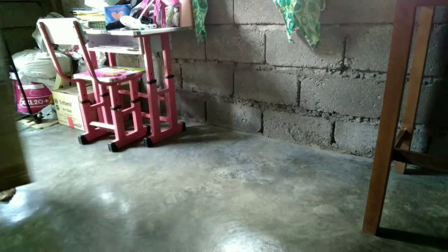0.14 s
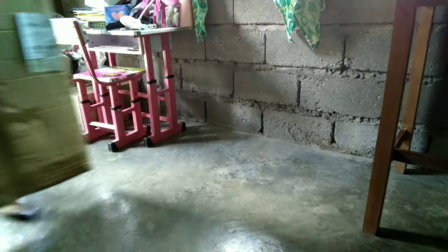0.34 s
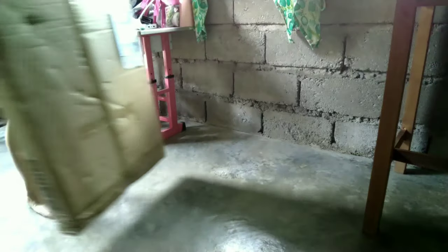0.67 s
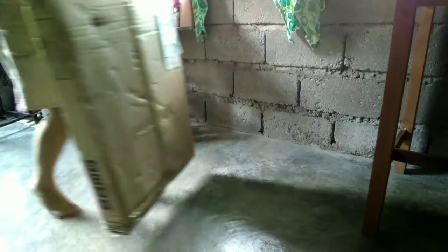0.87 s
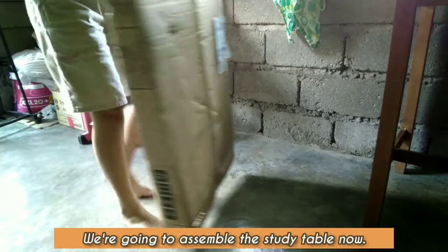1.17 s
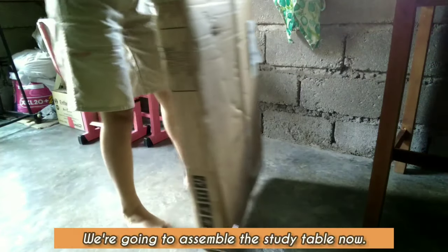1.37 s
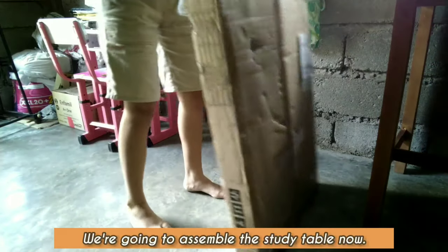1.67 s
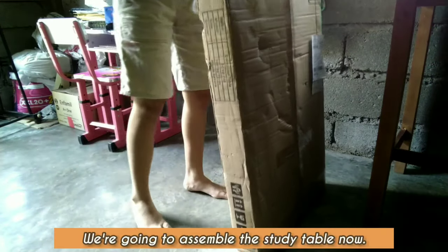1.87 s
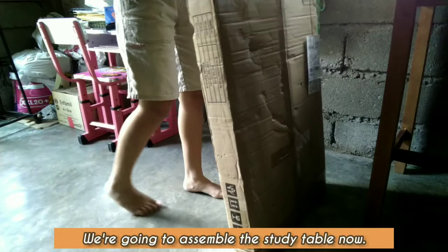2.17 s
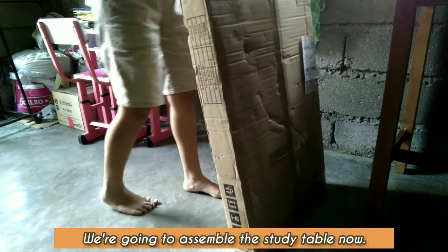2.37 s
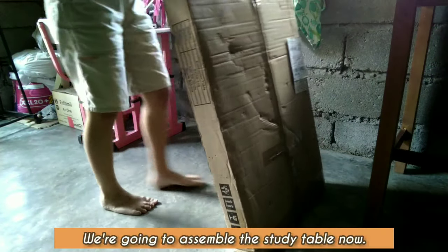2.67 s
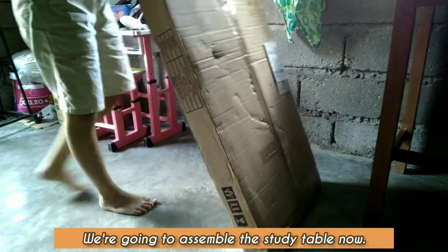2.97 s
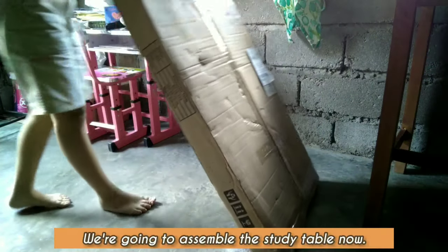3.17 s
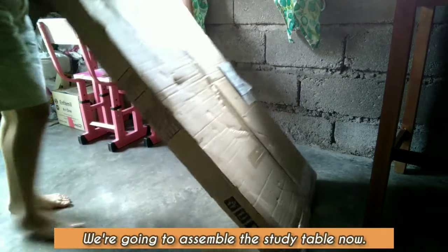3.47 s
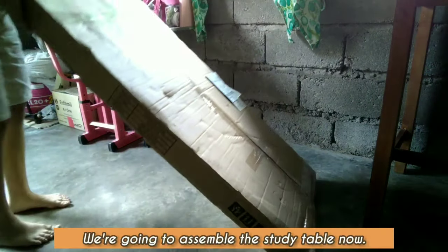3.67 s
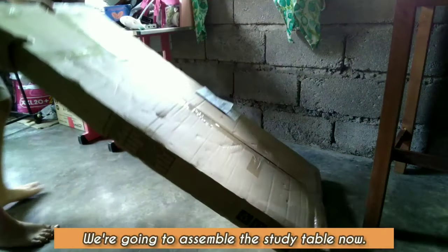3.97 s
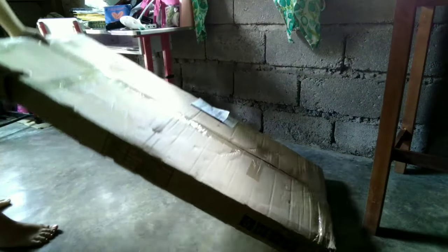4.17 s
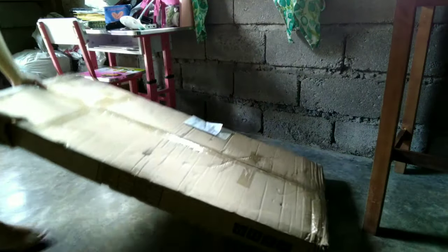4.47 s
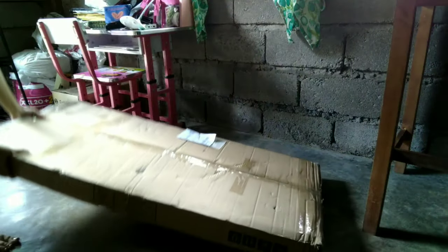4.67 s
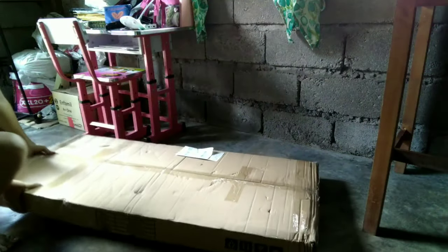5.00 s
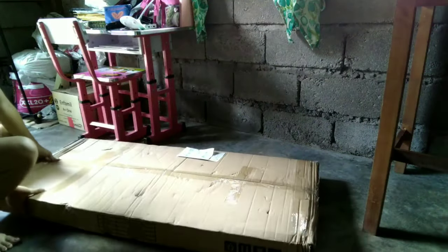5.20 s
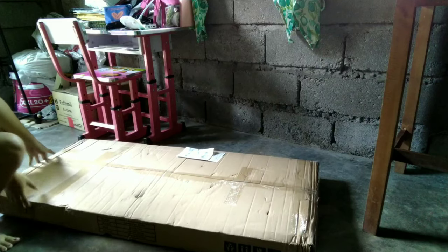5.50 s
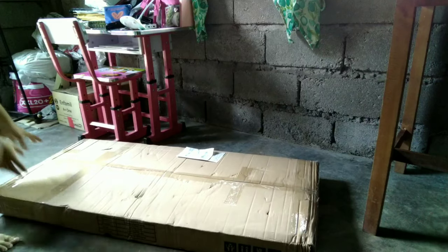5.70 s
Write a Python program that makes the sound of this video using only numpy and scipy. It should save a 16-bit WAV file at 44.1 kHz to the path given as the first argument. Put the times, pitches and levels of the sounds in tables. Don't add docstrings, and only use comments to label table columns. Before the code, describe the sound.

A low, uneven traffic rumble fills a small bare room, with barely audible hand rubbing on cardboard. From about 0.2 s a large flat box is carried in, giving soft, dull knocks and light dry rubs until 1.7 s. Between 1.8 and 2.2 s it is stood on the concrete: a quick, hollow cluster of thumps with a bright scuff. Quieter dragging follows, and from 2.7 to 3.9 s the box tips, its edge grating while the contents knock and tick, strongest around 3.7 s. A faint engine hums low from 3.8 to 5.2 s as steady scraping continues, with a sharper scuff near 4.7 s. At 4.95 s the board lands in a run of knocks, and the loudest, boomy blow comes at 5.3 s. Small rubs, a bright catch near 5.55 s and faint taps end it. Close stereo pickup, short hard-walled echo, muffled lows and crisp papery grit.

```python
import sys
import numpy as np
from scipy import signal
from scipy.fft import rfft, irfft, next_fast_len
from scipy.io import wavfile
from scipy.ndimage import uniform_filter1d, map_coordinates

SR = 44100
rng = np.random.default_rng(int(sys.argv[2]) if len(sys.argv) > 2 else 0)


def unload_wav(signal):
    wavfile.write(
        sys.argv[1],
        SR,
        np.round(np.clip(np.atleast_2d(signal).T, -1, 1) * 32767).astype(np.int16),
    )


def attenuation_scalar(level_db):
    decades = np.asarray(level_db, float) / 20
    return 10 ** decades


N = 257833

# start_s, level_db (peak), pitch_hz (panel), brightness_db
CARRIED_KNOCKS = [(.238, -32, 726, -20), (.252, -33, 437, -26), (.348, -47.5, 409, -22.5),
                  (.504, -56, 284, -19), (.672, -42.5, 520, -10), (.785, -37.5, 600, -18.5),
                  (.884, -43, 587, -12), (.892, -35, 700, -26), (1.122, -46, 276, -26),
                  (1.209, -47, 384, -7), (1.26, -41.5, 600, -15), (1.269, -36.5, 794, -21),
                  (1.395, -37.5, 770, -28), (1.564, -39.5, 705, -15), (1.629, -51, 900, -15),
                  (1.704, -51, 800, -12), (1.73, -42.5, 330, -25)]
STOOD_KNOCKS = [(1.796, -35.5, 630, -1.5), (1.843, -26.5, 453, -12), (1.866, -31, 382, -28),
                (1.893, -33.5, 330, -25), (1.91, -29, 626, -24), (1.938, -31, 704, -26),
                (1.959, -45, 673, -24), (2.004, -25, 536, -28), (2.028, -29, 600, -9),
                (2.05, -46, 426, -20), (2.124, -37, 328, -4), (2.147, -34, 360, -2.5),
                (2.223, -37, 650, -7.5), (2.33, -51, 641, 5.5), (2.394, -43, 650, 0)]
TIPPED_KNOCKS = [(2.758, -41.5, 444, -17.5), (2.925, -34.5, 675, -5.5), (3.128, -49, 726, -12),
                 (3.218, -38, 264, -18), (3.295, -29, 483, -23), (3.31, -35, 610, -10),
                 (3.328, -35.5, 245, -24), (3.63, -28.5, 750, -10), (3.642, -30, 330, -28),
                 (3.699, -31.5, 484, -9.5), (3.715, -24.5, 423, -17.5), (3.749, -33.5, 560, -18),
                 (3.765, -40, 400, -18.5), (3.826, -37, 700, 0)]
LAID_KNOCKS = [(4.947, -35, 641, -15), (4.958, -28.5, 400, -22), (4.975, -28, 523, -16.5),
               (4.992, -25.5, 377, -19), (5.01, -28, 480, -17), (5.035, -26.5, 350, -12),
               (5.069, -32.5, 383, -16), (5.11, -33.5, 320, -27), (5.15, -35.5, 302, -27.5),
               (5.18, -34.5, 280, -31), (5.266, -30, 440, -6), (5.283, -19.5, 417, -22.5),
               (5.299, -24.5, 330, -6.5), (5.306, -26, 420, -8), (5.315, -29.5, 654, -9),
               (5.329, -36, 498, -1), (5.349, -27, 400, -8.5), (5.365, -37, 330, -10),
               (5.453, -41.5, 255, -8), (5.702, -47, 331, -25), (5.72, -43, 500, -32),
               (5.77, -38.5, 460, -32)]
# start_s, level_db (peak), pitch_hz
THUDS = [(0.228, -42.5, 157), (.892, -41.5, 183), (1.908, -36, 150), (2.75, -42.5, 139), (3.229, -43, 200),
         (3.322, -41, 118), (4.05, -41.5, 133), (4.299, -46.5, 130), (4.654, -49, 130), (4.962, -37, 127),
         (5.279, -31.5, 142), (5.439, -47, 204)]
# start_s, level_db (peak), pitch_hz
TICKS = [(0.242, -61, 1000), (0.4597, -57, 1140), (1.037, -63, 1490), (1.393, -41.5, 1140),
         (1.564, -45.5, 1130), (2.328, -41, 1440), (2.9265, -50, 1610), (3.15, -44.5, 1190),
         (3.2948, -37, 1400), (3.423, -40, 1270), (3.6334, -42.5, 1030), (3.716, -38, 1670),
         (3.829, -41, 1010), (5.0744, -41.5, 1000), (5.1967, -45, 1430), (5.4538, -40, 960)]
# rattle_t60_s, breadth (of the ring, as a share of its pitch)
CARRIED_RING, STOOD_RING, TIPPED_RING, LAID_RING = (0.096, 0.35), (0.11, 0.77), (0.12, 0.99), (0.13, 0.92)
THUD_RING, TICK_RING = (0.24, 0.36), (0.052, 0.07)
THUD_BRIGHT_DB, TICK_BRIGHT_DB = -49, -27
RING_HOLDS = 0.48
# pitch_hz, width_hz, level_db
PANELS = [(135, 210, -5.5), (250, 67, -1.5), (334.6, 99, 3.5), (444, 50, 1.5), (633, 73, -2),
          (858, 137, -4), (1300, 1100, -22)]
# start_s, level_db (peak), pitch_hz, length_s
FLEXES = [(0.01, -59, 412, 0.16), (0.238, -38, 820, 0.027), (0.345, -53, 763, 0.019),
          (0.67, -50, 473, 0.027), (1.267, -39, 800, 0.015), (1.844, -34, 433, 0.014),
          (2.003, -28.5, 598, 0.013), (2.922, -41.5, 893, 0.025), (3.416, -29.5, 291, 0.021),
          (3.629, -41, 1660, 0.014), (3.713, -28, 340, 0.014), (4.96, -38, 131, 0.088),
          (5.018, -34, 250, 0.088), (5.284, -19, 402, 0.014), (5.348, -30, 406, 0.015),
          (5.44, -51.5, 1550, .03), (5.6, -50.5, 571.4, 0.29), (0.787, -48, 688, .025),
          (.888, -41, 797, 0.016), (1.393, -50, 840, .018), (1.391, -54, 2300, .012),
          (2.925, -47.5, 3315, .014), (3.128, -46, 760, 0.019), (3.325, -41.5, 500, 0.018),
          (3.418, -45.5, 1500, .015), (1.27, -60, 2000, 0.013), (1.564, -52, 783, 0.023),
          (1.854, -36.5, 454, 0.015), (1.909, -35, 650, 0.01), (1.919, -38.5, 296, .018),
          (1.935, -34, 753, .012), (2.025, -37, 800, 0.011), (3.292, -42, 603, 0.016),
          (3.626, -35, 716, 0.0088), (3.634, -36, 375, 0.013), (3.701, -30.5, 460, 0.007),
          (3.738, -37.5, 483, 0.015), (3.712, -46, 1660, 0.016), (4.961, -34.5, 518, 0.021),
          (4.988, -31, 396, .014), (5.008, -38, 372, 0.032), (5.043, -38.5, 325, .045),
          (5.296, -26, 292, 0.029), (5.517, -47, 683, .028), (5.54, -48, 427, 0.024),
          (5.73, -45, 560, 0.023), (5.769, -45.5, 430, .06)]
# peak_s, level_db, swell_s (per 10 dB), sink_s (per 10 dB), fine_hiss_db
RUBS = [(0.228, -61.5, -0.08, 0.06, 3), (.45, -67, 0.1, 0.1, -9), (.6, -69.5, 0.1, 0.2, -2),
        (.8, -68, 0.07, 0.2, -7), (.02, -71.5, 2, 0.3, 1), (.72, -70.5, 0, 0.4, 0),
        (0.947, -54, 0.03, 0.02, 5), (1.045, -64.5, 0.07, .04, 0), (1.16, -64.5, 0.02, 0.22, 2),
        (1.27, -58.5, 0.04, 0, -4), (1.37, -69, 0.1, 0.1, 0), (1.395, -61, -0.02, -0.02, -10),
        (1.563, -63, .01, 0.1, 0.5), (1.63, -70, -0.1, 0.2, -6), (1.71, -60, -0.17, 0, -9),
        (1.81, -62, -0.07, -0.05, -3), (1.868, -45, 0.006, 0.0538, -1.5), (1.93, -53.5, 0.0136, 0.05, -15),
        (2.019, -52, -0.02, 0.12, -5.5), (2.06, -50.5, -0.04, 0.03, -21), (2.149, -49.5, 0.01, 0.04, -11),
        (2.2, -61, .03, 0.12, -2)]
DRAGS = [(2.259, -55.5, -0.16, 0.47, -7), (2.42, -56.5, 0.04, 0.1, -3.5), (2.51, -57, 0.09, 0.08, -3),
         (2.66, -59.5, 0.1, .04, -5), (2.74, -60, 0.1, 0.03, -1.5), (2.86, -60.5, 0.1, 0.3, -5),
         (2.928, -50.5, 0.006, 0.03, -11), (2.98, -56.5, 0.09, 0.7, -3), (3.14, -53, 0.09, 0.2, -4),
         (3.3, -55, 0.02, 0, -23.5), (3.425, -59.5, 0.19, -0.4, -3.5), (3.475, -55, 0.15, -0.17, -1),
         (3.56, -54.5, 0.19, -0.24, -7), (3.635, -51, 0.14, -0.06, -2.5), (3.745, -53.5, 0.22, -0.09, 0),
         (3.79, -56.5, 0.2, -0.33, -1), (3.832, -53.5, 0.08, -0.04, -6), (4.01, -53.5, 0.08, 0.35, -6),
         (4.13, -50.5, 0.27, 0.18, -2.5), (4.43, -52.5, 0.1, 0.12, -2), (4.729, -45.5, 0.07, 0.05, -1.5),
         (4.84, -64, 0.15, -0.1, -5), (4.898, -55, .06, 0.2, -4.5), (4.961, -40, -0.0473, 0.0463, -0.5),
         (5.07, -56, 0.02, 0.23, -2), (5.17, -55.5, 0.09, .06, -1), (5.23, -51, 0.07, .04, -7),
         (5.27, -51.5, 0.05, 0.03, -1.5), (5.293, -38.5, 0.01, 0.01, -24), (5.36, -55, 0.18, 0.17, -3.5),
         (5.55, -53, 0.08, 0.08, -1), (5.63, -60, 0, .08, -2), (5.69, -64, 0.3, 0.24, -3),
         (5.75, -57.5, 0.1, -0.7, -5), (5.85, -54, 0.08, .05, -4)]
REST_DB, REST_FINE_DB = -69.5, -5.5
STROKE_ROUND = 1.34
BODY_HZ, BODY_LOSES = 1220, 0.55
# pitch_hz, level_db (per Hz)
GRIT_COLOUR = [(290, -9), (500, -3.5), (648, -1.5), (1170, -7.5), (2420, -10.5), (2880, -12), (4100, -12),
               (7040, -22), (8300, -31.5), (10800, -55), (18300, -120)]
# pitch_hz, level_db (per Hz)
FINE_COLOUR = [(4710, -14), (8000, -7.5), (9630, -2), (12000, 0.5), (15000, -4), (15500, 2.5), (15800, -22)]
# start_s, level_db (peak)
CATCHES = [(.2458, -49), (1.0375, -48), (1.1456, -44), (1.2022, -46), (1.796, -43.5), (1.854, -35.5),
           (2.0088, -48), (2.309, -42), (3.4206, -43), (4.9465, -32.5), (5.5517, -37), (5.8371, -50)]
CATCH_T60_S = 0.14
# time_s, level_db
LOAD = [(0, -67.5), (.9, -62), (1.55, -58.5), (1.7, -57.5), (1.97, -47.5), (2.25, -54), (2.7, -58.5),
        (3.1, -55), (3.66, -51.5), (4.5, -57), (4.85, -55.5), (5.1, -47.5), (5.34, -45.5), (5.5, -51.5),
        (5.85, -51.5)]
FACES_DB, FACES_FOLLOW, SIDES_DB = -58, 0.78, -3.5
# pitch_hz, t60_s
ROOM_DECAY = [(200, 0.29), (2000, 0.13), (10000, 0.098)]
# time_s, level_db
TRAFFIC = [(0, -53.5), (.2, -51), (.75, -53), (1.4, -50), (1.7, -50.5), (2.2, -51.5), (2.75, -53.5),
           (2.95, -52.5), (3.6, -54), (4.2, -50.5), (5.15, -51), (5.85, -52)]
UPPER_DB, UPPER_FOLLOWS = -54.5, 0.091
# pitch_hz, level_db (per Hz)
DEEP_COLOUR = [(13, -31), (22, -1), (35, -3), (65, 6), (86, 4), (100, -5), (130, -52), (220, -120)]
# pitch_hz, level_db (per Hz)
UPPER_COLOUR = [(56, -29), (95, -17.5), (130, -4.5), (177, -12), (260, -20), (340, -47), (570, -120)]
# time_s, firing_hz, level_db
ENGINE = [
    (3.76, 59.25, -65),
    (3.82, 60.2, -44.5),
    (4.1, 60.6, -42.5),
    (4.4, 60.05, -42.5),
    (4.75, 60.6, -43),
    (4.85, 61.3, -47),
    (5.1, 62.5, -53),
    (5.3, 62.8, -68),
]
# start_s, length_s, firing_hz, glide_hz_per_s, level_db (rms)
DRONES = [
    (0, 0.33, 78.9, -5.5, -51.5),
    (.2, 0.53, 52.1, -3, -52),
    (.1, 0.58, 133.5, 1.5, -55.5),
    (1.101, 0.99, 75.95, 4.5, -50),
    (1.15, 0.43, 118.4, -10.5, -55),
    (2.55, 0.38, 61.7, 58, -47.5),
    (2.6, .6, 45.8, -4.5, -53),
    (3, .4, 66.1, -0.5, -53.5),
    (5.301, 0.51, 71.5, -1, -57),
]
# pitch_hz, likeness (1 = same, 0 = unrelated)
ALIKE = [(60, 0.91), (100, 0.93), (180, 0.92), (310, 0.91), (550, 0.71), (950, 0.22), (1650, -0.037),
         (2860, -0.08), (4970, -0.03), (8640, 0.043), (15000, -0.023)]
# pitch_hz, level_db
PORT_COLOUR = [(20, -23), (36, 0.5), (6000, -0.5), (7300, -5), (8100, -7), (8800, -3.5), (9500, -0.5),
               (15000, -1.5), (15500, -12), (15750, -60)]


def unit(x):
    return x / np.sqrt(np.mean(x ** 2) + 1e-20)


def along(points, hz):
    f, v = np.transpose(points)
    return np.interp(np.log(hz + 1), np.log(f + 1), v)


def curves(rows):
    s, *cols = np.transpose(rows)
    return [np.interp(np.arange(N) / SR, s, c) for c in cols]


def wobble(rate):
    knots = rng.standard_normal(int(N * rate / SR) + 4)
    return map_coordinates(knots, [np.arange(N) * rate / SR])


def filtered(x, response):
    m = next_fast_len(x.shape[-1] + 3000)
    spectrum = rfft(x, m) * response(np.fft.rfftfreq(m, 1 / SR))
    return irfft(spectrum, m)[..., :x.shape[-1]]


def resonant(modes):
    def response(f):
        total = 0
        for k, (centre, width, db) in enumerate(modes):
            ring = 1j * f * width / (centre * centre - f * f + 1j * f * width)
            total = total + (-1) ** k * attenuation_scalar(db) * ring
        return total
    return response


def grains(size, spread_db):
    sizes = attenuation_scalar(spread_db * rng.standard_normal((2, size)))
    return rng.standard_normal((2, size)) * sizes


def hush(spectrum, source):
    return unit(filtered(source, lambda hz: attenuation_scalar(along(spectrum, hz))))


def steadied(x, seconds):
    return unit(x / np.abs(uniform_filter1d(x ** 2, int(seconds * SR))) ** 0.33)


def blows():
    box = [(CARRIED_KNOCKS, CARRIED_RING), (STOOD_KNOCKS, STOOD_RING),
           (TIPPED_KNOCKS, TIPPED_RING), (LAID_KNOCKS, LAID_RING)]
    knocked = [row + ring for rows, ring in box for row in rows]
    thudded = [row + (THUD_BRIGHT_DB,) + THUD_RING for row in THUDS]
    ticked = [row + (TICK_BRIGHT_DB,) + TICK_RING for row in TICKS]
    return knocked + thudded + ticked


def knocks():
    out, t = np.zeros((2, N + SR)), np.arange(SR // 5) / SR
    panels = resonant(PANELS)
    for s, db, hz, bright_db, t60, breadth in blows():
        fade = attenuation_scalar(-60 * t / t60) * (1 - np.exp(-t / 0.0016))
        rattle = grains(len(t), spread_db=2.5) * fade
        first_contact = np.sqrt(0.34 * np.sum(rattle ** 2, 1))
        rattle[:, 30] += first_contact * [1, rng.choice([-1, 1])]

        spot = resonant([(hz, breadth * hz, 0)])
        soft_hammer = lambda f: 1 / (1 + 1j * f / (1.9 * hz)) ** 2
        box = filtered(rattle, lambda f: spot(f) * (2.2 + panels(f)) * soft_hammer(f))

        swing = np.abs(uniform_filter1d(box ** 2, size=int(1.5 * SR / hz)))
        swing = swing / np.sum(box ** 2, 1, keepdims=True)
        smooth = fade ** 2 / np.sum(fade ** 2)
        box = box * (smooth / (swing + 1e-7)) ** (RING_HOLDS / 2)
        box *= np.sqrt(np.sum(fade ** 2) / np.sum(box ** 2, 1, keepdims=True))

        edge = hush(GRIT_COLOUR, rng.standard_normal((2, len(t)))) * fade ** 1.37
        blow = attenuation_scalar(db - 4.5) * (box + attenuation_scalar(bright_db - 0.5) * edge)
        out[:, round((s + 0.0015) * SR):][:, :len(t)] += blow
    return out[:, :N]


def flexes():
    out = np.zeros((2, N + SR))
    for s, db, hz, length in FLEXES:
        t = np.arange(round(length * SR)) / SR
        swell = np.sin(np.pi * (t / length) ** 0.83) ** 2
        drift = np.cumsum(rng.normal(0, 0.0037, (2, len(t))), 1)
        cycles = hz * t + rng.random((2, 1)) + drift
        out[:, round(s * SR):][:, :len(t)] += attenuation_scalar(db) * swell * np.sin(2 * np.pi * cycles)
    return out[:, :N]


def strokes():
    t = np.arange(0, N, 32) / SR
    s, db, swell, sink, fine_db = np.transpose(RUBS + DRAGS)[:, :, None]
    pace = np.clip(np.where(t < s, swell, sink), 0.005, 2)
    power = attenuation_scalar(2 * (db - 10 * (np.abs(t - s) / pace) ** STROKE_ROUND))
    body_db = -BODY_LOSES * np.clip(fine_db + 4, -8, 20)
    body = (power * attenuation_scalar(2 * body_db)).sum(0) + attenuation_scalar(2 * (REST_DB - 1.5))
    grit = power.sum(0) + attenuation_scalar(2 * REST_DB)
    fine = (power * attenuation_scalar(2 * fine_db)).sum(0) + attenuation_scalar(2 * (REST_DB + REST_FINE_DB))
    return [np.interp(np.arange(N) / SR, t, np.sqrt(p)) for p in (body, grit, fine)]


def patchy(x, depth_db):
    z = signal.stft(x, nperseg=256)[2]
    field = uniform_filter1d(rng.standard_normal(z.shape[1:]), size=3, axis=0)
    field = uniform_filter1d(field, size=9, axis=1)
    return signal.istft(z * attenuation_scalar(depth_db * unit(field)), nperseg=256)[1][:, :N]


def scrape():
    body, grit, fine = strokes()
    slip_db = 0.3 * wobble(14) + 1.1 * wobble(90)
    fibres = patchy(grains(N, spread_db=2.5), depth_db=2.0)
    coarse = hush(GRIT_COLOUR, fibres)
    low = filtered(coarse, lambda hz: 1 / (1 + (hz / BODY_HZ) ** 4))
    rubbing = attenuation_scalar(1.5) * (body * low + grit * (coarse - low))
    return attenuation_scalar(slip_db) * (rubbing + fine * hush(FINE_COLOUR, fibres))


def catches():
    t = np.arange(N) / SR
    burst = np.zeros(N)
    for s, db in CATCHES:
        onset = np.clip((t - s) / 0.0056, 0, 1)
        burst += attenuation_scalar(db - 7.5 - 60 * np.abs(t - s) / CATCH_T60_S) * onset
    fibres = grains(N, spread_db=2.5)
    return burst * (hush(FINE_COLOUR, fibres) + attenuation_scalar(-4.5) * hush(GRIT_COLOUR, fibres))


def drumming():
    load_db, = curves(LOAD)
    uneven = attenuation_scalar(2 * wobble(45))
    faces = filtered(grains(N, spread_db=5.5), resonant(PANELS[1:3]))
    sides = filtered(grains(N, spread_db=5.0), resonant(PANELS[3:]))
    faces_db = FACES_DB + FACES_FOLLOW * (load_db - load_db.mean())
    sides_db = load_db + SIDES_DB
    return uneven * (attenuation_scalar(faces_db) * steadied(faces, 0.054) + attenuation_scalar(sides_db) * steadied(sides, 0.048))


def room(x):
    hz, t, z = signal.stft(rng.standard_normal((2, SR // 2)), SR, nperseg=256)
    decay = attenuation_scalar(-60 * t / along(ROOM_DECAY, hz)[:, None])
    tail = signal.istft(z * decay, SR, nperseg=256)[1]
    delayed = np.pad(x, ((0, 0), (300, 0)))
    return signal.fftconvolve(delayed, tail / np.linalg.norm(tail[0]), axes=1)[:, :N]


def outside():
    deep_db, = curves(TRAFFIC)
    upper_db = UPPER_DB + UPPER_FOLLOWS * (deep_db - deep_db.mean())
    deep = steadied(hush(DEEP_COLOUR, rng.standard_normal((2, N))), 0.091)
    upper = steadied(hush(UPPER_COLOUR, rng.standard_normal((2, N))), 0.14)
    rumble = attenuation_scalar(deep_db + 1.1 * wobble(5.4)) * deep
    rumble += attenuation_scalar(upper_db + 1.4 * wobble(7)) * upper

    firing_hz, engine_db = curves(ENGINE)
    turn = 2 * np.pi * np.cumsum(firing_hz * (1 + 0.01236 * wobble(13))) / SR
    throb = attenuation_scalar(engine_db + 0.63 * wobble(12))
    rumble[0] += throb * (np.sin(turn) + attenuation_scalar(-12.5) * np.sin(2.0 * turn))
    return rumble


def drones():
    out, unsteady = np.zeros((2, N + SR)), 1 + 0.015 * wobble(10)
    for s, length, hz, glide, db in DRONES:
        t = np.arange(round(length * SR)) / SR
        pitch_hz = (hz + glide * t) * np.resize(unsteady[round(s * SR):], len(t))
        turn = 2 * np.pi * np.cumsum(pitch_hz) / SR
        swell = np.sin(np.pi * t / length) ** 0.73
        out[0, round(s * SR):][:len(t)] += attenuation_scalar(db + 2) * swell * np.sin(turn)
    return out[:, :N]


def scene():
    struck = knocks() + flexes()
    field = struck + attenuation_scalar(-12.5) * room(struck)
    field = field + scrape() + catches() + drumming() + outside() + drones()
    turn = lambda hz: np.arccos(np.clip(along(ALIKE, hz), -1, 1)) / 2
    mid, side = filtered(field, lambda hz: np.array([1 + 0 * hz, np.tan(turn(hz))]))
    return np.array([mid + side, mid - side]) * attenuation_scalar([[0.2], [-0.2]])


def low_pass(x):
    return signal.sosfilt(signal.butter(12, 16220, fs=SR, output="sos"), x)


def record(dry):
    mix = filtered(dry, lambda hz: attenuation_scalar(along(PORT_COLOUR, hz)))
    return low_pass(mix)


dry = scene()
out = record(dry)
unload_wav(out)
```